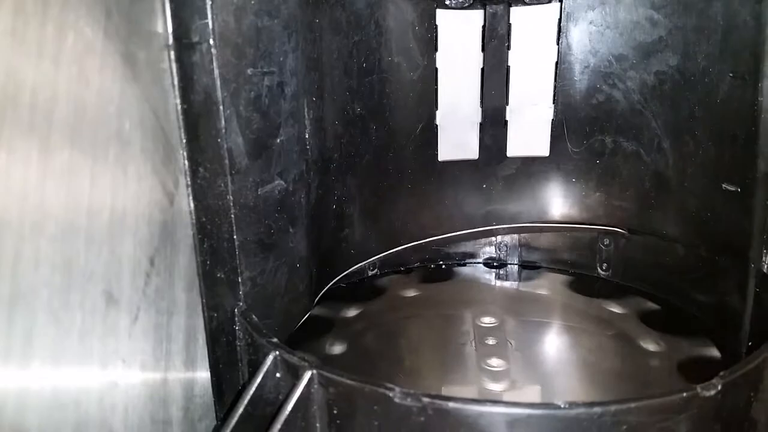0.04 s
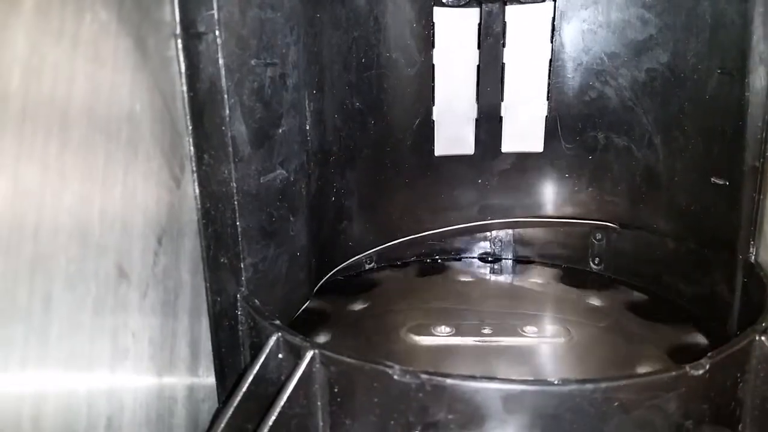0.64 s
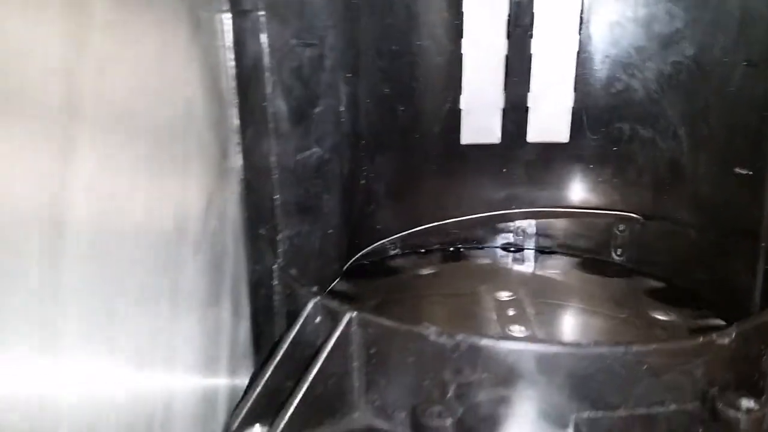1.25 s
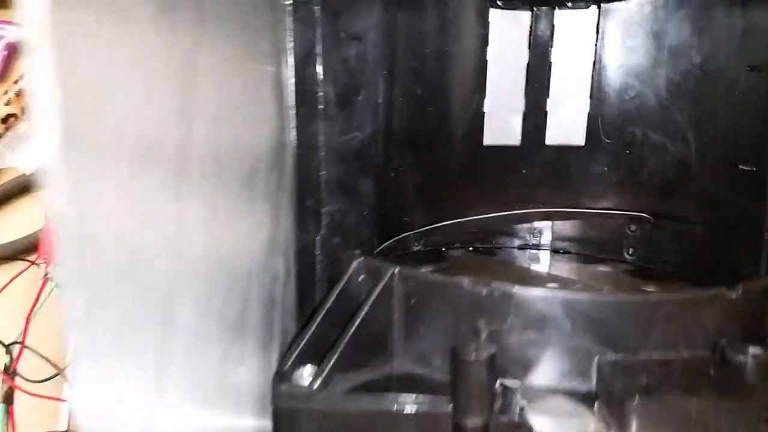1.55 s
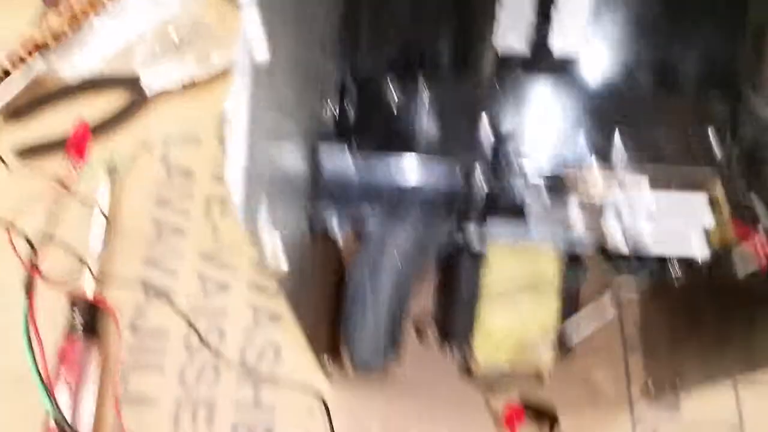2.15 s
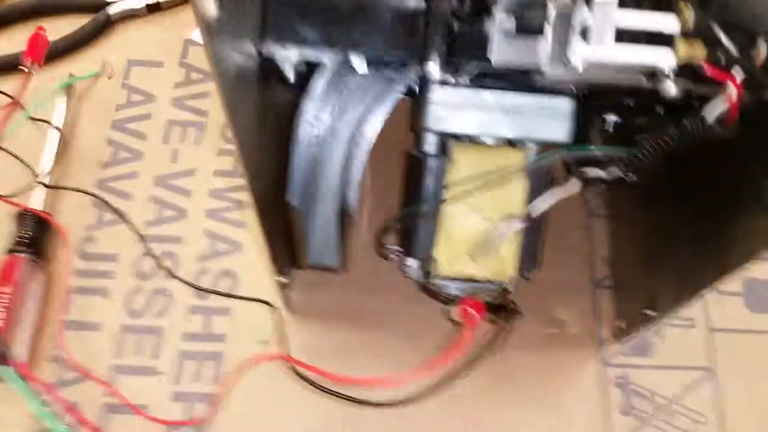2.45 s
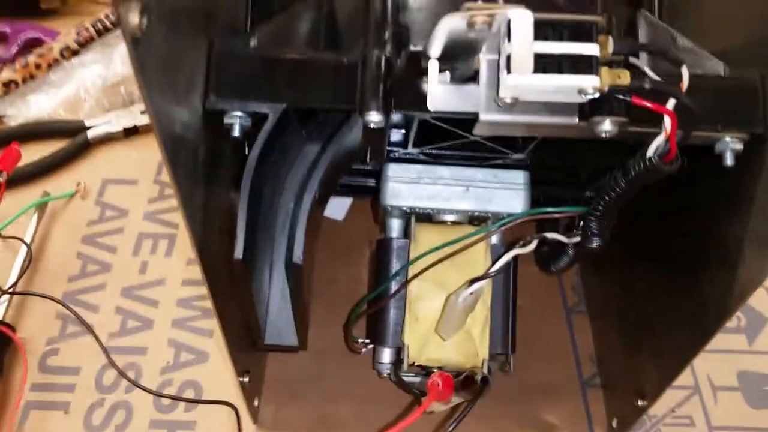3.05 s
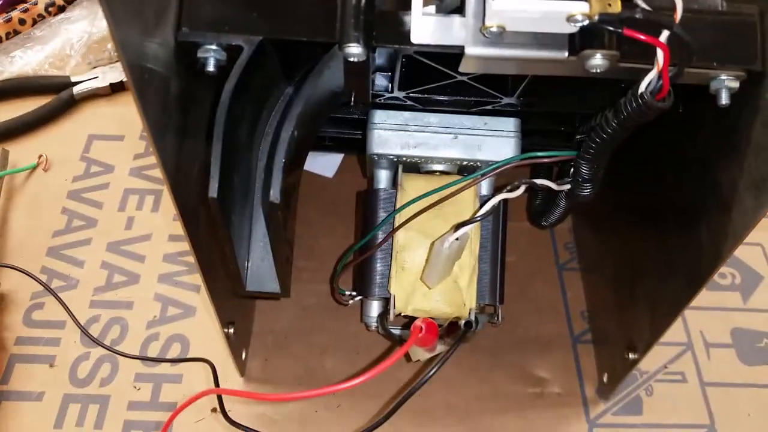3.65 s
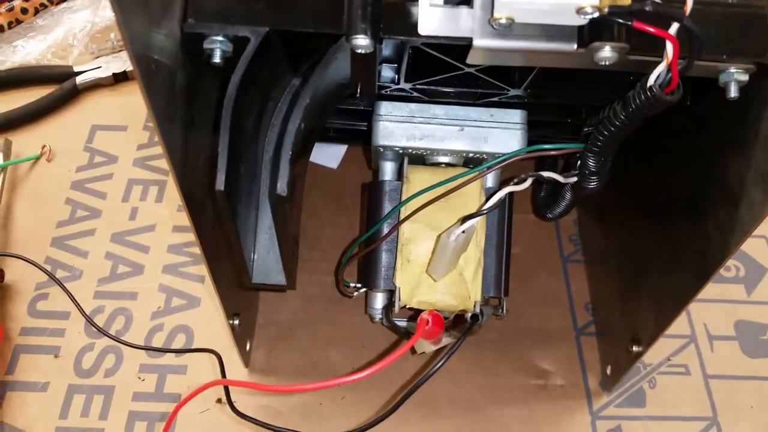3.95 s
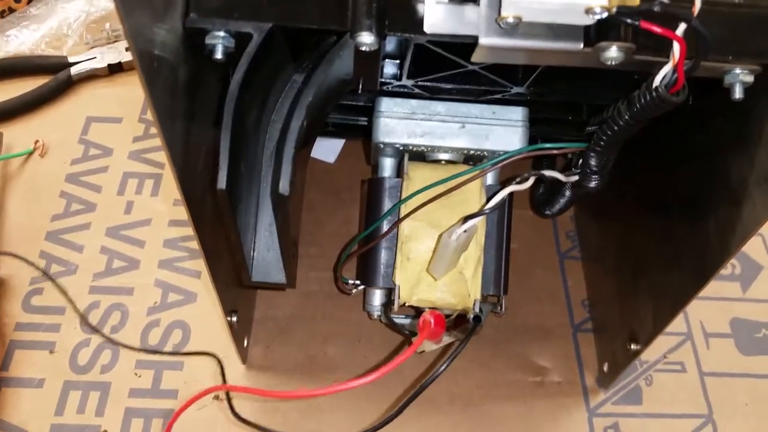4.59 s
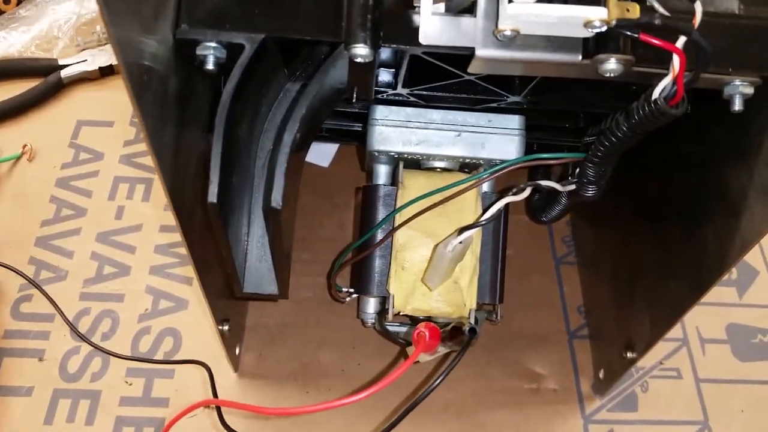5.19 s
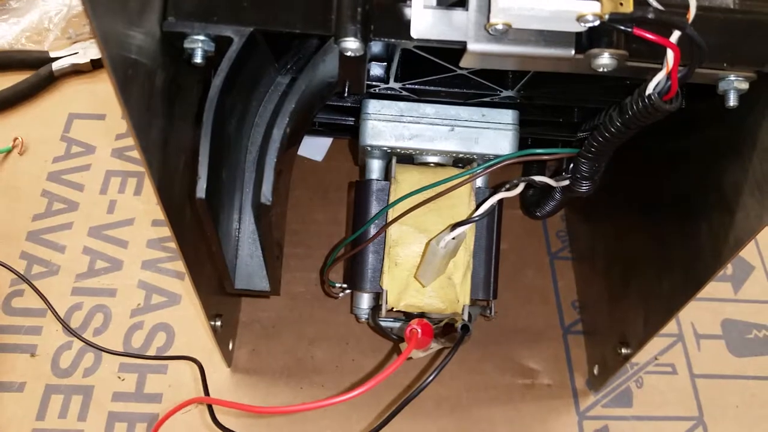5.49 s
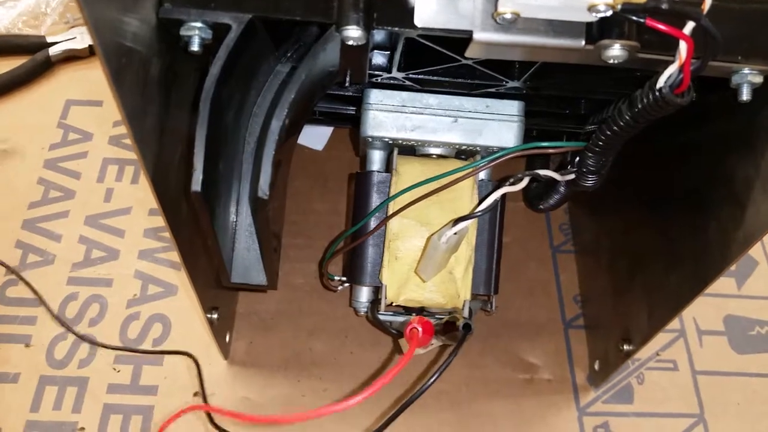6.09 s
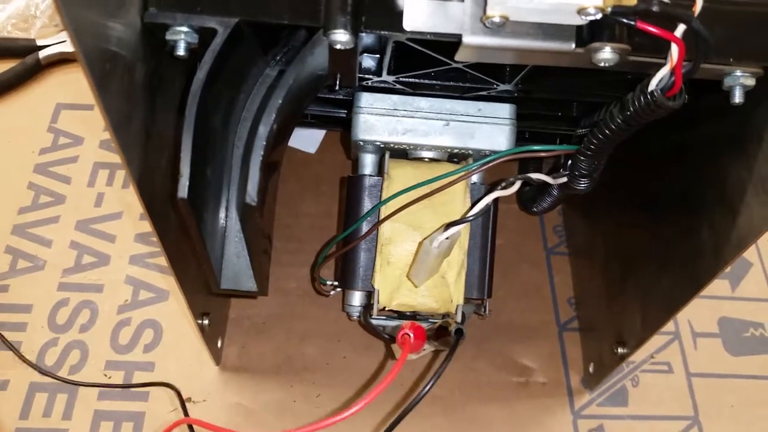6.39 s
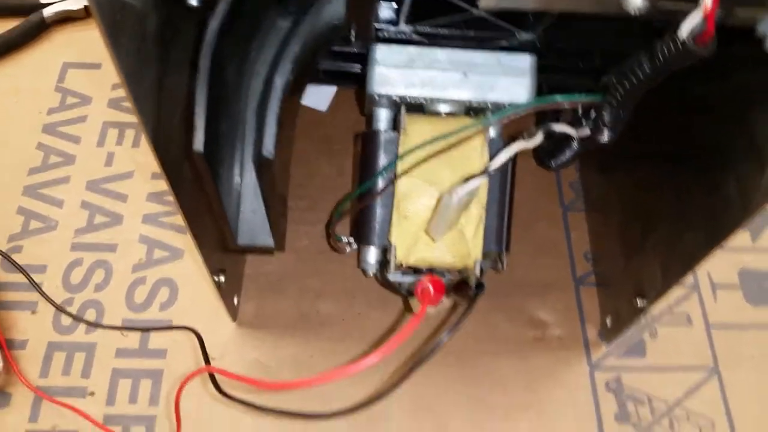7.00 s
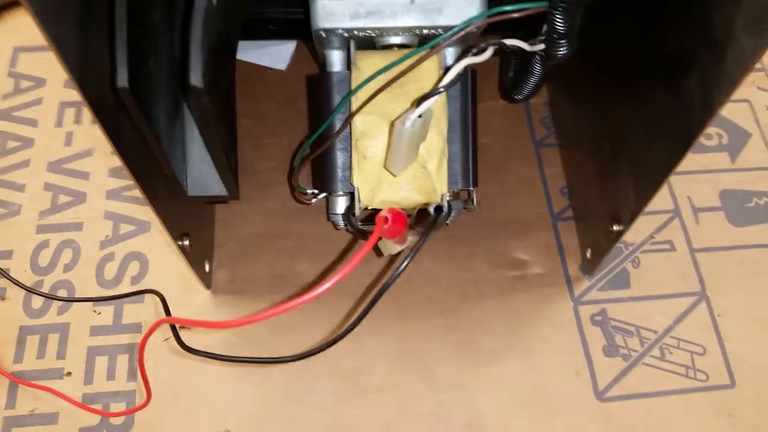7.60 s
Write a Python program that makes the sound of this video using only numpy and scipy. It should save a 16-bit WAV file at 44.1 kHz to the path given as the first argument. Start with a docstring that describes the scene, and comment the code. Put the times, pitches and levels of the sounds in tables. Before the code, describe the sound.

Loud, fast mechanical rattling and gear grinding come from a small motor spinning a metal disc inside a housing, heard up close in a workshop. The motor coasts to a stop with a few clacks. Switched on again, it jams briefly with an electric buzz, hammers free, rattles on and winds down once more. Soft handling bumps fill the pauses, and a finger thumps the microphone at the end.

```python
"""Rapid knocking over grinding gears, close by: a small mains gear motor turns a steel disc in a
plastic and sheet-metal housing, its loose rotor knocking once a turn. The motor is cut and coasts to
rest, slack gears clacking. Switched on again, it chatters, stalls with a hum, buzzes, catches, runs
and stops. Knocks, gears and buzz ring the housing; hands bump the microphone."""
import sys
import numpy as np
from scipy import signal
from scipy.fft import rfft, irfft, next_fast_len
from scipy.io import wavfile

SR = 44100
rng = np.random.default_rng(int(sys.argv[2]) if len(sys.argv) > 2 else 0)


def put_to_file(sound):
    """Save the sound as 16-bit audio at rate SR, in the file named by the first command-line argument."""
    columns = np.atleast_2d(sound).T  # one column per channel
    safe = np.clip(columns, -1, 1)
    whole_steps = np.round(safe * 32767)
    wavfile.write(sys.argv[1], SR, whole_steps.astype(np.int16))


N = 345744
TIME = np.arange(N) / SR

ROTOR_HZ, PULL_HZ = 51.21, 120.054  # magnetic pull: twice per mains cycle
LAG_SPAN_CYCLES = .45
GRIND_RISE_DB_PER_S = 4996.5

# steady running (first knock [s], last knock [s])
RUN_SPANS = [(.0145, 1.735), (4.3152, 6.311)]
# turns with a missed knock (time [s])
MISSED_TURNS_S = [.19, .21, .659, 1.167, 1.46, 4.999, 5.292, 5.682]
# turns with an extra hard knock (time [s])
HARD_TURNS_S = [.448, .506, 1.639, 4.338, 5.704, 6.038, 6.155, 6.271]
# single knocks as the rotor gains or loses speed (time [s], level [dB])
SINGLE_KNOCKS = [(1.753, -20.5), (1.7869, -13), (1.809, -18), (3.76, -23), (4.293, -12), (6.3293, -11),
                 (6.337, -19), (6.35, -17), (6.3732, -15), (6.418, -19.5)]
# gears turning (start [s], coast start [s], grind [dB], frame rumble [dB])
GEAR_SPANS = [(0, 1.739, -28.5, -39.5), (3.6, 3.696, -35.5, -39), (4.26, 6.305, -28.5, -37)]
# resonances (frequency [Hz], width [Hz], above disc L [dB], R [dB], beside motor L [dB], R [dB])
HOUSING_MODES = [(428, 94, -6.5, -15, -12.5, -14), (500, 55, -2.5, -8.0, -5, -9.0),
                 (593.3, 41, -4, -10.5, -7, -8.5), (624, 28, -5, -7.5, -5, -15.5),
                 (749, 220, -14, -15, -16, -19.5), (886, 78, -6.5, -11.5, -7, -10.5),
                 (1026, 45, -12, -13, -7, -17), (1179, 130, -7.5, -11, -6.5, -14),
                 (1336, 150, -8, -11, -5.5, -13.5), (1480, 89, -2, -9, -2, -8),
                 (1713, 83, -10, -16, -5, -14), (1860, 90, -14.5, -18, -7.5, -14),
                 (2378, 310, -12, -13.5, -9.5, -14), (3066, 850, -15.5, -17.5, -19.5, -19.5),
                 (4310, 550, -20, -11, -25, -14.5), (5267, 260.0, -13, -8, -18, -5),
                 (5520, 750, -17.5, -11.5, -13, -9), (7400, 1000, -14, -15.5, -14.5, -16.5),
                 (7920, 898.0, -10.5, -16, -9.5, -18.5), (8650, 450, -9, -14, -10, -14),
                 (9210, 570, -10.5, -15, -8, -14), (10120, 1200, -11.5, -13, -14.5, -15),
                 (10766, 230, -7.5, -14, -10, -14), (11575, 380, -11.5, -13, -12, -13),
                 (13200, 1600, -21, -21.5, -20.5, -20.5)]
# microphone path (time [s], place [0 above disc, 1 beside motor])
MIC_PATH = [(1.4, 0.078), (2.5, 0.97)]
# running tones (rotor multiple [-], pull multiple [-])
TONE_MULTIPLES = [(1, 0), (2, 0), (3, 0), (1, 1), (-1, 2), (3, 1), (7, 0), (10, 0), (11, 0), (11, 1)]
# same tones (above disc [dB], beside motor [dB])
TONE_LEVELS_DB = [(-57.5, -55.5), (-57.5, -42.5), (-41.5, -54.5), (-47, -48), (-49, -53.5), (-49.5, -52),
                  (-44.5, -44), (-46, -50), (-34.5, -35.5), (-53.5, -47)]
# coil hum, loudest when jammed (start [s], end [s], level [dB], sag [dB/s])
HUM_SPANS = [(0, 1.92, -37, 3), (3.745, 4.25, -27.5, 9.5), (4.299, 6.27, -37, 4)]
# pull harmonics 1-5 (level [dB])
HUM_LEVELS_DB = [-1.5, -28, -16, -17, -17]
# frame and workshop rumble (frequency [Hz], density [dB])
RUMBLE_SPECTRUM = [(25, -12.5), (80, -11.5), (115, 3), (160, -3.5), (230, -8.5), (340, -12.5), (600, -31.5),
                   (1500, -47)]
# background hiss (frequency [Hz], density [dB])
HISS_SPECTRUM = [(700, -1.5), (1500, -3.5), (2900, -13.5), (4300, 0), (5800, -25.5), (9000, -13.5),
                 (14000, -16.5)]
# slack gears at run-down (time [s], level [dB])
GEAR_CLACKS = [(1.755, -3), (1.787, -5.5), (1.81, -8), (1.861, -9.5), (6.304, -1), (6.335, 3), (6.353, -5),
               (6.378, -1.5), (6.42, -4.5), (6.44, -17)]
# disc and frame after a stop (time [s], frequency [Hz], level [dB], fall [dB/s])
STOP_RINGS = [(1.829, 123.5, -46, 53), (1.828, 157.4, -41, 67), (1.98, 628, -61, 50),
              (6.48, 333.5, -49, 62)]
# parts settling or jamming (start [s], end [s], level [dB], frequency [Hz], width [Hz])
PART_SCRAPES = [(2.075, 2.153, -78, 8650, 800), (3.75, 3.792, -37.5, 1360, 350),
                (6.785, 6.8, -47, 400, 183), (6.787, 6.83, -69, 10900, 8000)]
# hands on the microphone (time [s], level [dB])
HAND_BUMPS = [(2.277, -46.5), (2.98, -46), (3.13, -48), (3.395, -43), (3.51, -38), (6.653, -34.5),
              (6.719, -43), (6.775, -45), (6.971, -45.5), (7.776, -39.5)]
# hand bumps (frequency [Hz], density [dB])
BUMP_SPECTRUM = [(40, -12), (110, 9), (190, -2), (400, -15), (700, -36)]
# stalled rotor's thin buzz (frequency [Hz], density [dB])
STALL_SPECTRUM = [(700, -7.5), (900, 1), (1140, -6), (1450, -4.5), (2400, -6.5), (5600, -13), (7500, -6.5),
                  (8450, 6), (9000, -7), (14000, 3.5)]
# jammed rotor's rasp (frequency [Hz], density [dB])
RASP_SPECTRUM = [(900, -15), (1750, 2), (2350, -2.5), (3150, 7.5), (3500, -17.5)]
# rotor hammering before it catches (frequency [Hz], density [dB])
HAMMER_SPECTRUM = [(300, -17.5), (520, 0), (1110, -5), (1550, 3.5), (2700, 3.5), (5200, -2.5), (9330, 0),
                   (13800, -7.5)]


def from_db(db):
    """Decibels to gain."""
    return 10 ** (np.asarray(db) / 20)


def rms_one(x):
    """Scale to rms 1."""
    return x / np.sqrt(np.mean(x ** 2) + 1e-20)


def cut(x, hz, kind, order=2):
    """Butterworth low-pass or high-pass."""
    return signal.sosfilt(signal.butter(order, hz, kind, fs=SR, output="sos"), x)


def drift(hz):
    """Low-passed noise, rms 1."""
    return rms_one(cut(rng.standard_normal(N + SR), hz, "low")[SR:])


def colour(x, spectrum, skirt_db_per_octave=24):
    """Shape by a (frequency [Hz], density [dB]) curve; rms 1."""
    hz, db = np.transpose(spectrum)
    size = next_fast_len(N + 4096)
    bins_hz = np.maximum(np.arange(size // 2 + 1) * SR / size, 1)
    octaves_outside = np.abs(np.log2(bins_hz / np.clip(bins_hz, hz[0], hz[-1])))
    gain = from_db(np.interp(np.log(bins_hz), np.log(hz), db) - skirt_db_per_octave * octaves_outside)
    return rms_one(irfft(rfft(x, size) * gain, size)[..., :N])


def stereo_noise(shared):
    """White noise with L/R correlation `shared`."""
    return np.sqrt(shared) * rng.standard_normal(N) + np.sqrt(1 - shared) * rng.standard_normal((2, N))


def strikes(times_s, gains):
    """One impulse at each time."""
    samples = np.round(np.asarray(times_s) * SR).astype(int)
    return np.bincount(np.clip(samples, 0, N - 1), gains, N) + 1e-18


def fade(x, t60_s):
    """Impulses to exponential decays of equal height."""
    return signal.lfilter([1], [1, -from_db(-60 / (t60_s * SR))], x)


def resonate(x, hz, width_hz):
    """Two-pole resonance, peak gain 1."""
    r = np.exp(-np.pi * width_hz / SR)
    feedback = [1, -2 * r * np.cos(2 * np.pi * hz / SR), r * r]
    return signal.lfilter(np.array([1, 0, -1]) * (1 - r * r) / 2, feedback, x)


def swell(start_s, end_s, db, rise_db_per_s, fall_db_per_s, sag_db_per_s=0):
    """Gain: reaches db at start_s, holds or sags, falls after end_s."""
    rise_db = rise_db_per_s * np.maximum(start_s - TIME, 0)
    sag_db = sag_db_per_s * (np.clip(TIME, start_s, end_s) - start_s)
    fall_db = fall_db_per_s * np.maximum(TIME - end_s, 0)
    return from_db(np.maximum(db - rise_db - sag_db - fall_db, -200))


def rotor_turns(slip_cycles=.145, slip_width_cycles=.06):
    """Per turn: (time [s], past slip [pull cycles], miss [0-1], hard [bool]); slip weakens a knock."""
    turns_s = np.concatenate([np.arange(first, last, 1 / ROTOR_HZ) for first, last in RUN_SPANS])
    past_slip = (turns_s * PULL_HZ - slip_cycles) % 1
    lost, hard = [np.abs(turns_s[:, None] - times_s).min(axis=1) * ROTOR_HZ < .5
                  for times_s in (MISSED_TURNS_S, HARD_TURNS_S)]
    slipped = .5 * np.exp(-(np.minimum(past_slip, 1 - past_slip) / slip_width_cycles) ** 2)
    return turns_s, past_slip, np.maximum(slipped, lost), hard


def knock_schedule(wane_db=3.5, miss_db=12.5, hard_db=1.5, scatter_db=1.77, lag_s=.0026,
                   chatter_start_s=3.5942, jam_s=3.75, growth_db_per_s=43):
    """Knocks (time [s], level [dB]): one a turn, set by the pull's phase; restart chatter; singles."""
    turns_s, past_slip, missed, hard = rotor_turns()
    turn_db = -10 - wane_db * past_slip - miss_db * missed + hard_db * hard
    turn_db += scatter_db * rng.standard_normal(len(turns_s))
    landing_s = turns_s + lag_s * np.exp(-past_slip / LAG_SPAN_CYCLES)
    chatter_s = np.arange(chatter_start_s, jam_s, 2 / PULL_HZ)  # rotor rocks once per mains cycle
    chatter_db = -24.5 + growth_db_per_s * (chatter_s - chatter_start_s)
    single_s, single_db = np.transpose(SINGLE_KNOCKS)
    return np.r_[landing_s, chatter_s, single_s], np.r_[turn_db, chatter_db, single_db]


def rotor_knocks(peak_s=.0025, tail_db=-18, tail_t60_s=.08, grain_db=2.1, echo_db=-35):
    """Loose rotor: each knock is a crunch of tiny contacts, fast swell, slower decay."""
    times_s, db = knock_schedule()
    hits = strikes(times_s, from_db(db))
    age = TIME[:SR // 50] / peak_s
    crunch = (age * np.exp(1 - age)) ** 3
    tails = from_db(tail_db) * fade(hits, tail_t60_s) / crunch.sum()
    envelope = np.convolve(hits + tails, crunch)[:N]
    knocks = envelope * rms_one(stereo_noise(0) * from_db(grain_db * drift(1900)))
    return knocks + from_db(echo_db) * reflections(knocks.sum(0))


def reflections(x, t60_s=.08):
    """Dense, short echoes inside the housing, different per side."""
    echoes = (stereo_noise(0) * from_db(-60 * TIME / t60_s))[:, :SR // 10]
    return signal.fftconvolve(np.atleast_2d(x), echoes, axes=1)[:, :N]


def gear_load(running_db=-28.5, sag_db_per_s=1.0, coast_db_per_s2=899.5,
              tail_db=-23, tail_db_per_s=79.5):
    """Gear load, about 1 when running: instant bite, slight sag, steepening coast, faint tail."""
    load = 0
    for start_s, end_s, grind_db, _ in GEAR_SPANS:
        db = grind_db - running_db
        coast = from_db(-coast_db_per_s2 * np.clip(TIME - end_s, 0, 1) ** 2)
        load += coast * swell(start_s, end_s, db, GRIND_RISE_DB_PER_S, 0, sag_db_per_s)
        load += swell(start_s, end_s, db + tail_db, GRIND_RISE_DB_PER_S, tail_db_per_s)
    return load


def free_flight(lapse_db=11, lapse_s=.016):
    """Grind gain: lapses while the rotor flies free, just before its latest and hardest knocks."""
    turns_s, past_slip, missed, hard = rotor_turns()
    freedom = np.maximum(np.exp(-past_slip / LAG_SPAN_CYCLES) * (1 - missed) ** 2, hard)
    lapses = np.convolve(strikes(turns_s, freedom), np.hanning(int(lapse_s * SR)), "same")
    return from_db(-lapse_db * lapses)


def gear_grind(load, turn_depth=.19, pull_depth=.12, uneven_db=.88, grain_db=3.0, treble_db=-11):
    """Teeth scrape and tick, pulsing with rotor and pull; only the lows match on both sides."""
    throb = 1 + turn_depth * np.cos(2 * np.pi * ROTOR_HZ * TIME)
    throb += pull_depth * np.cos(2 * np.pi * PULL_HZ * TIME)
    contact = rms_one(throb * from_db(uneven_db * drift(29) + grain_db * drift(1000)))
    lows = cut(stereo_noise(1), 900, "low", order=3)
    highs = cut(stereo_noise(.21), 1000, "high", order=3)
    teeth = cut(contact * (lows + highs), 2000, "low")
    return load * (teeth + from_db(treble_db) * contact * stereo_noise(0))


def housing(force, place, wander_db=.86, groups=5):
    """Panel modes ring, varying from knock to knock; the L/R mix follows the microphone."""
    above, beside = 0, 0
    pushes = [force * from_db(wander_db * drift(25)) for _ in range(groups)]
    for k, (hz, width_hz, *db) in enumerate(HOUSING_MODES):
        mode = resonate(pushes[k % groups], hz, width_hz)
        gains = (-1) ** k * from_db(db)[:, None]
        above += gains[:2] * mode
        beside += gains[2:] * mode
    return (1 - place) * above + place * beside


def running_tones(load, place, waver_rad=.62, flutter_db=3.5, run_down_s=.25):
    """Unbalance, tooth mesh and pull sidebands: waver with gear play, sink as the motor coasts."""
    coasting_s = sum((TIME > end) * (TIME < end + .5) * (TIME - end) for _, end, *_ in GEAR_SPANS)
    speed = np.exp(-coasting_s / run_down_s)
    turns = ROTOR_HZ * np.cumsum(speed) / SR
    tones = 0
    for (rotor, pull), (above_db, beside_db) in zip(TONE_MULTIPLES, TONE_LEVELS_DB):
        phase = 2 * np.pi * (rotor * turns + pull * PULL_HZ * TIME) + waver_rad * drift(7.8)
        db = above_db + place * (beside_db - above_db) + flutter_db * drift(33)
        tones += from_db(db) * np.sin(phase)
    return np.sqrt(2) * load * speed * tones


def coil_hum(waver_rad=.25, flutter_db=.3, rise_db_per_s=446, fall_db_per_s=128.5):
    """The core hums at harmonics of the pull, each slightly unsteady."""
    harmonics = 0
    for k, db in enumerate(HUM_LEVELS_DB, 1):
        gain = from_db(db + flutter_db * drift(4.8))
        phase = 2 * np.pi * (k * PULL_HZ * TIME + rng.random()) + waver_rad * drift(10)
        harmonics += gain * np.sin(phase)
    currents = [swell(start_s, end_s, db, rise_db_per_s, fall_db_per_s, sag)
                for start_s, end_s, db, sag in HUM_SPANS]
    return np.sqrt(2) * np.max(currents, axis=0) * harmonics


def background(db, dip_db, hold_s=.73, return_s=.65):
    """Background gain: low while the gears turn, swelling back a while after a stop."""
    dips = [(TIME >= start_s) * np.clip(1 - (TIME - end_s - hold_s) / return_s, 0, 1)
            for start_s, end_s, *_ in GEAR_SPANS]
    return from_db(db - dip_db * np.max(dips, axis=0))


def rumble(fall_db_per_s=40.5, hand_db=-60):
    """Gears shake the frame, over low noise from the workshop and the hand on the microphone."""
    shake = sum(swell(start_s, end_s, db, GRIND_RISE_DB_PER_S, fall_db_per_s)
                for start_s, end_s, _, db in GEAR_SPANS)
    frame = shake * colour(stereo_noise(.78), RUMBLE_SPECTRUM)
    workshop = background(-51.5, dip_db=24) * colour(stereo_noise(.85), RUMBLE_SPECTRUM)
    hand = from_db(hand_db) * rms_one(cut(stereo_noise(.4), 90, "low"))
    return cut(frame, 100, "high", order=3) + cut(workshop, 50, "high", order=1) + hand


def room_hum(hz=233.0, db=-64, waver_rad=.3):
    """Faint, wavering workshop hum."""
    return np.sqrt(2) * from_db(db) * np.sin(2 * np.pi * hz * TIME + waver_rad * drift(2.9))


def room_hiss():
    """Faint hiss, dipping while the gears turn."""
    return background(-76, dip_db=26) * colour(stereo_noise(.16), HISS_SPECTRUM)


def gear_clacks(t60_s=.052):
    """Unloaded teeth slap across their play."""
    times_s, db = np.transpose(GEAR_CLACKS)
    envelope = fade(strikes(times_s, from_db(db)), t60_s)
    return cut(envelope, 150, "low") * stereo_noise(.12)


def after_rings(waver_rad=.25, flutter_db=3.5, rise_db_per_s=300):
    """Disc and frame ring on after a stop, wavering slightly."""
    sway_rad = waver_rad * drift(11)
    flutter = from_db(flutter_db * drift(24))
    rings = sum(swell(at_s, at_s, db, rise_db_per_s, fall) * np.sin(2 * np.pi * hz * TIME + sway_rad)
                for at_s, hz, db, fall in STOP_RINGS)
    return np.sqrt(2) * flutter * rings


def scrapes(rise_db_per_s=500, fall_db_per_s=350):
    """Parts rub briefly, each in its own resonance."""
    rub = stereo_noise(.37)
    sound = 0
    for start_s, end_s, db, hz, width_hz in PART_SCRAPES:
        band = rms_one(resonate(resonate(rub, hz, width_hz), hz, width_hz))
        sound += swell(start_s, end_s, db, rise_db_per_s, fall_db_per_s) * band
    return sound


def hand_bumps(t60_s=.4, soften_hz=70):
    """Hands bump the microphone: soft, low noise bursts."""
    times_s, db = np.transpose(HAND_BUMPS)
    envelope = cut(fade(strikes(times_s, from_db(db)), t60_s), soften_hz, "low")
    return envelope * colour(stereo_noise(.86), BUMP_SPECTRUM)


def rotor_buzz(spectrum, ring_t60_s, rough, crunch_t60_s=.018, uneven_db=3.0, harmonics=125):
    """The rotor taps the frame at every pull: a repeating ring plus a crunch that differs each time."""
    size = 4096  # wavetable of one pull cycle
    phase = (TIME * PULL_HZ - .63) % 1
    decay = from_db(-60 * np.arange(size) / size / PULL_HZ / ring_t60_s)
    tap = rfft(rng.standard_normal((2, size)) * decay)[:, :harmonics]
    cycle = irfft(tap / np.abs(tap), size)
    ring = rms_one(cycle[:, (phase * (size - 1)).astype(int)])
    crunch = rms_one(from_db(-60 * phase / PULL_HZ / crunch_t60_s) * stereo_noise(0))
    return colour(ring + rough * from_db(uneven_db * drift(PULL_HZ)) * crunch, spectrum)


def jammed_rotor(rise_db_per_s=686, fall_db_per_s=194.5):
    """The stalled rotor buzzes thinly, rasps briefly, then hammers itself free."""
    stall = swell(3.76, 4.15, -22.5, rise_db_per_s, fall_db_per_s)
    rasp = swell(3.92, 4.0, -27, rise_db_per_s=176, fall_db_per_s=154.5)
    hammer = swell(4.166, 4.244, -3.5, rise_db_per_s, fall_db_per_s)
    return (stall * rotor_buzz(STALL_SPECTRUM, ring_t60_s=.021, rough=.65)
            + rasp * rotor_buzz(RASP_SPECTRUM, ring_t60_s=.066, rough=.2)
            + hammer * rotor_buzz(HAMMER_SPECTRUM, ring_t60_s=.035, rough=.8))


def finger_thump(at_s=7.692, hz=75, bend_hz=200, bend_s=.0025):
    """A finger hits the right microphone: a thump sinking in pitch, with a slap of skin."""
    touch = strikes([at_s], [1.0])
    age_s = np.maximum(TIME - at_s, 0)
    cycles = hz * age_s + bend_hz * bend_s * (1 - np.exp(-age_s / bend_s))
    thump = from_db(-15.5) * cut(fade(touch, t60_s=.055), 500, "low") * np.sin(2 * np.pi * cycles)
    skin = rms_one(cut(resonate(stereo_noise(.51), hz=1150, width_hz=600), 1800, "low"))
    slap = from_db(-41.5) * fade(touch, t60_s=.011) * skin
    return (cut(thump, 25, "high") + slap) * from_db([[-16], [0]])


def scene():
    """Rotor and gears drive the housing; hum, rumble, hiss and handling add directly."""
    place = np.interp(TIME, *np.transpose(MIC_PATH))
    load = gear_load()
    clacks = gear_clacks()
    force = from_db(17) * cut(rotor_knocks(), 4000, "high", order=1)
    force += gear_grind(load * free_flight())
    force += cut(clacks, 2520, "high", order=1)
    force += jammed_rotor()
    tooth_ring = from_db(2.5) * place * resonate(clacks, hz=1752, width_hz=84)
    lows = running_tones(load, place) + coil_hum() + rumble() + after_rings() + room_hum()
    lows *= from_db([[1.3], [-1.4]])  # left of centre
    hiss = room_hiss()
    return housing(force, place) + tooth_ring + scrapes() + lows + hiss + hand_bumps() + finger_thump()


def record(dry):
    """Clip at full scale, then low-pass steeply."""
    return cut(np.clip(dry, -1, 1), 14600, "low", order=20)


dry = scene()
out = record(dry)
put_to_file(out)
```